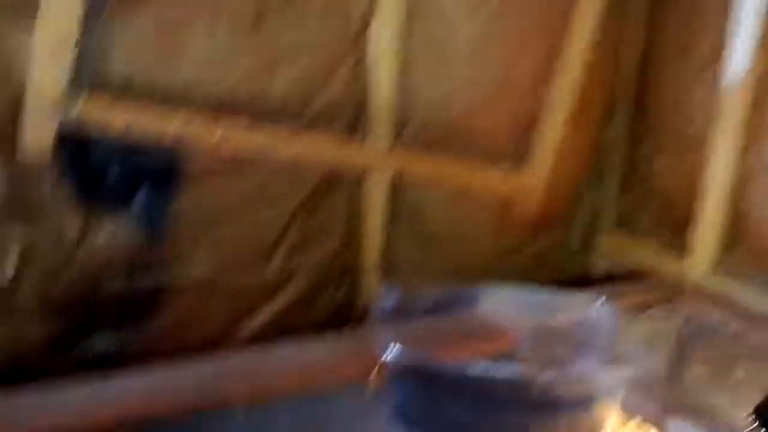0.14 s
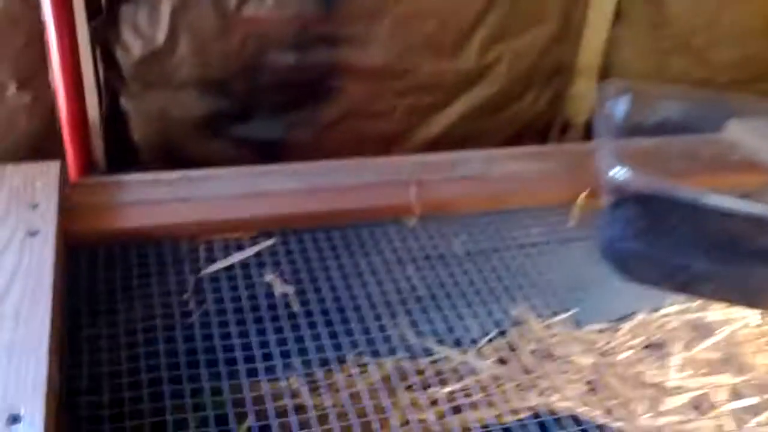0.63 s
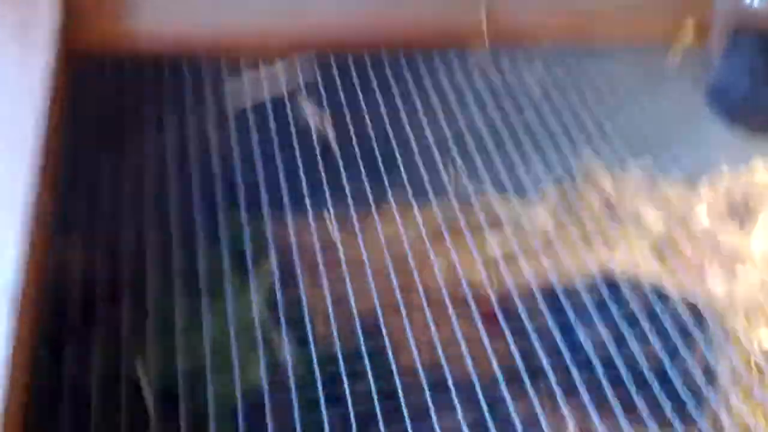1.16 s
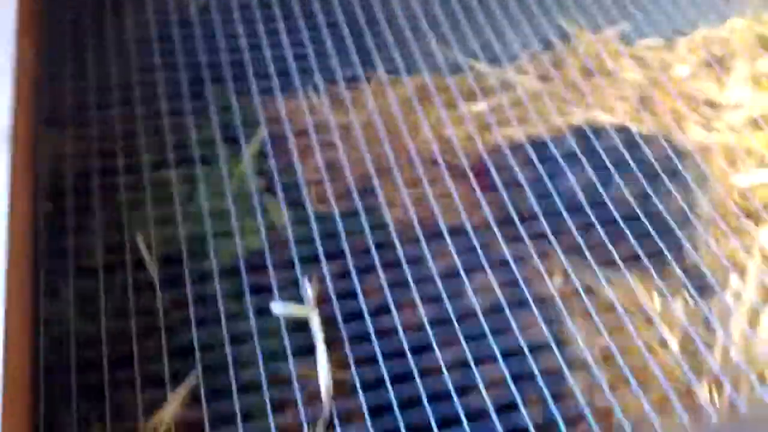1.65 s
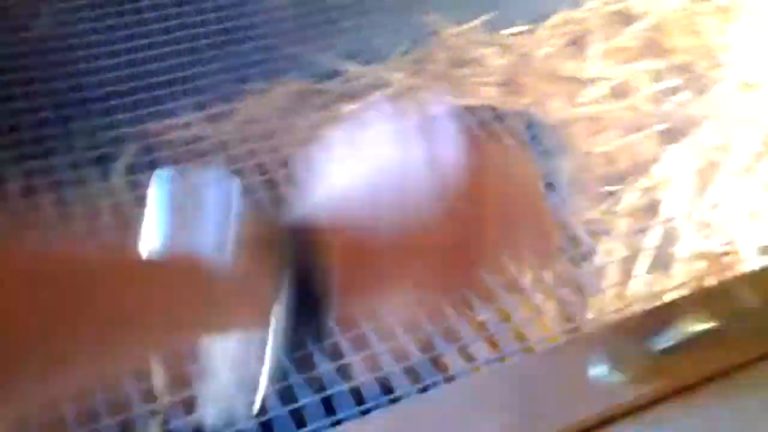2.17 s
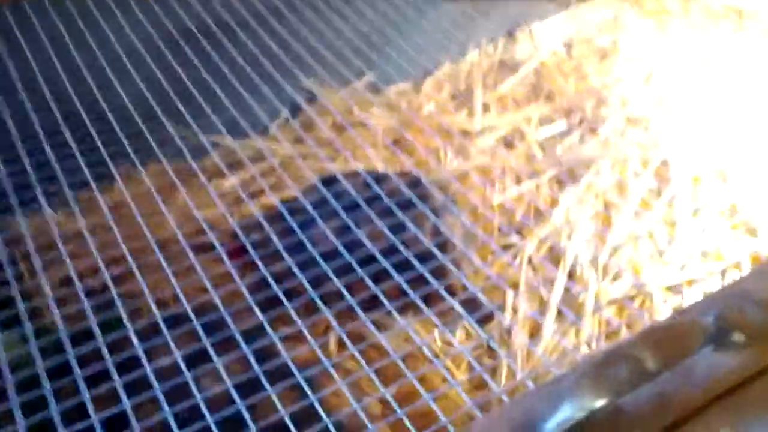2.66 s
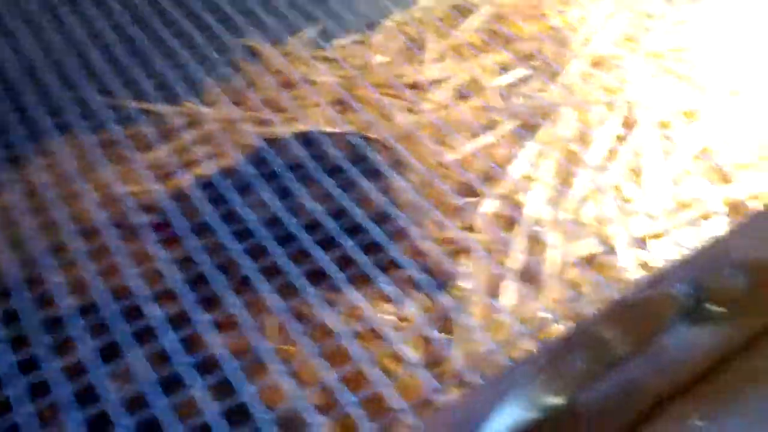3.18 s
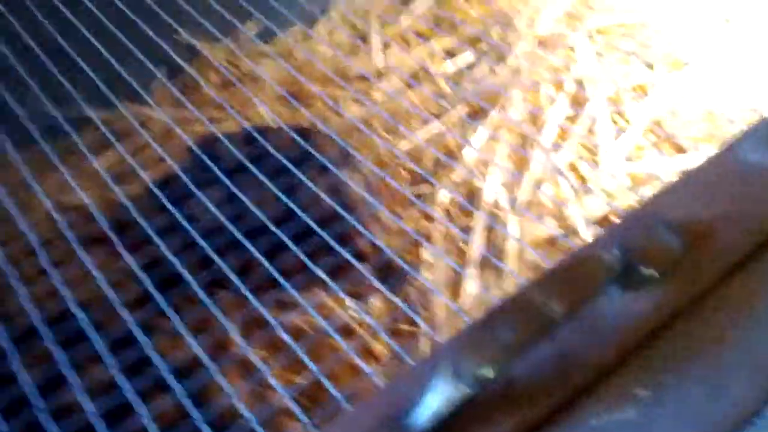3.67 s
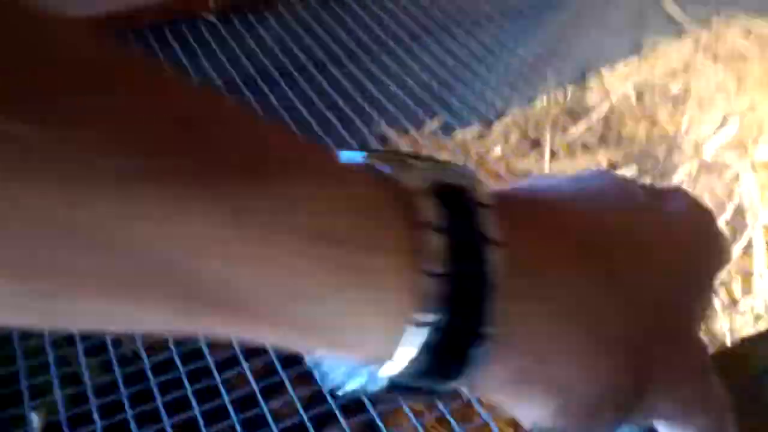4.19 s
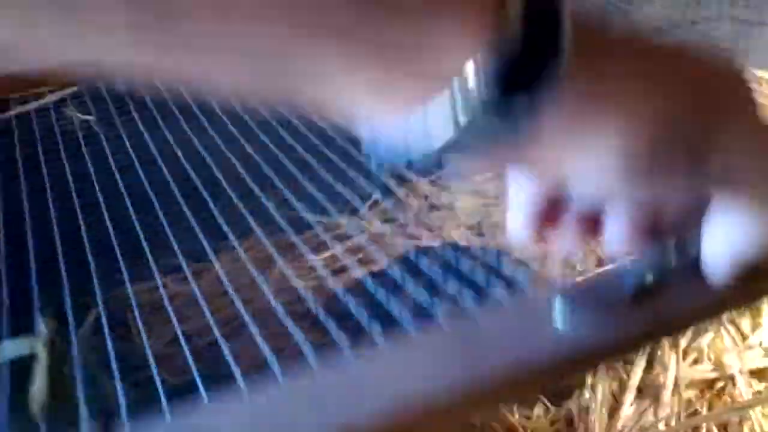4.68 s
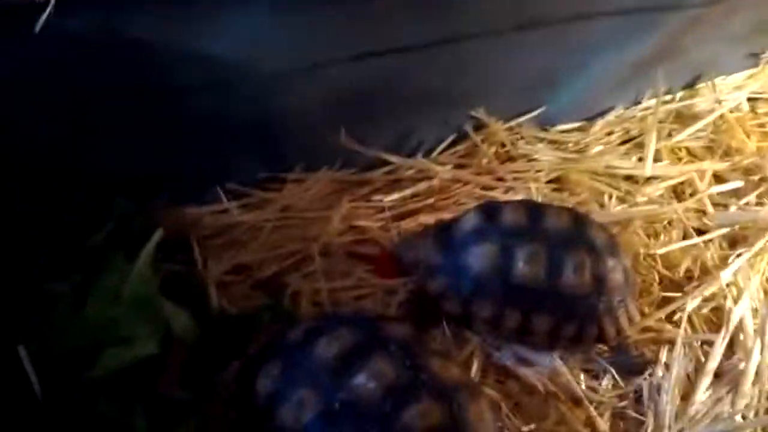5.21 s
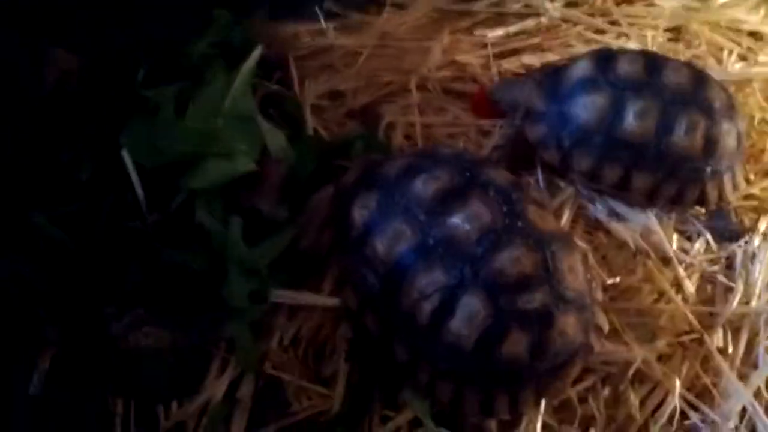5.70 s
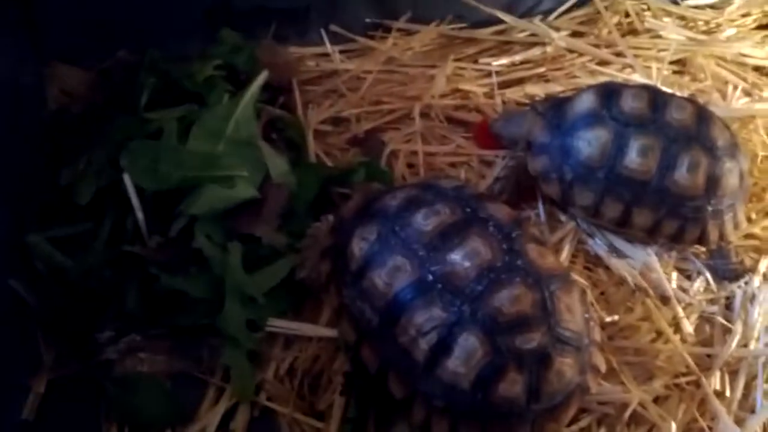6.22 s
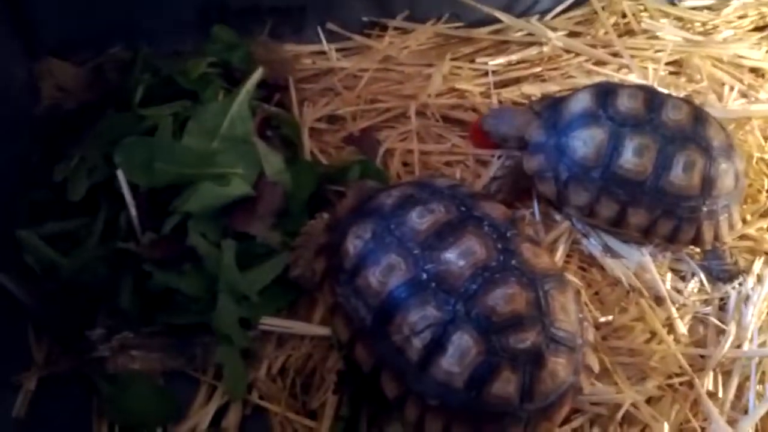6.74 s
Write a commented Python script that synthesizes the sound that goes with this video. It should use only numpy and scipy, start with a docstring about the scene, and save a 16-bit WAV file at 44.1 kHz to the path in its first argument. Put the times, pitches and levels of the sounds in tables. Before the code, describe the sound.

Close handling of a mesh-covered wooden pen: faint knocks, sharp cracks, scraping rattles and a dull thud, a short creak, then quiet hum and air.

```python
"""Mains hum and soft air noise in a small wooden shed, with a first knock almost at once. A hand
unlatches a wire mesh lid on a wooden pen: knocks and ticks on frame and wire, the lid drags and drops
with a thud, then a hinge creaks as it swings up. A hand-held phone hears it from close by.
Blows, rubbing strokes and hinge slips are noisy forces that ring banks of damped modes in wood and mesh;
the hum is sines, the air coloured noise, and ticks and squeaks are filtered bursts and brief tones."""
import sys
import numpy as np
from scipy import signal
from scipy.fft import rfft, irfft, next_fast_len
from scipy.io import wavfile
from scipy.ndimage import uniform_filter1d

SR = 44100
rng = np.random.default_rng(int(sys.argv[2]) if len(sys.argv) > 2 else 0)


def undo_db(level):
    """Turn decibels back into plain size, where 20 dB means ten times bigger."""
    steps = np.asarray(level, float) / 20
    return 10 ** steps


def output_pcm(signal):
    """Save a mono or channel-first signal as 16-bit PCM at the path in sys.argv[1].

    Samples are clipped to [-1, 1] before scaling.
    """
    pcm = np.clip(np.atleast_2d(signal).T, -1, 1) * 32767
    wavfile.write(sys.argv[1], SR, np.round(pcm).astype(np.int16))


N = 302305
T = np.arange(N) / SR

# ringing modes of the pen with its lid shut: (pitch_hz, relative_db, t60_s)
BOX = [(82, -1, 0.17), (137, -3, 0.14), (182.5, 3.5, 0.11), (232, 0.5, 0.1), (280, -3.5, 0.062),
       (343.5, -8, 0.13)]
FRAME = [(420, -9, 0.034), (477, -3, 0.095), (570, -1, 0.1), (610, -0.5, 0.043), (750, 2, 0.064),
         (700, 6.5, 0.054), (917, -1, 0.074), (1010, -4.5, 0.07)]
SLATS = [(1192, -6, 0.033), (1308, -3, 0.11), (1413, -3.5, 0.14), (1555, 6, 0.015), (1600, 1.5, 0.089),
         (1900, 0, 0.072), (2065, -5.5, 0.12), (2466, -0.5, 0.045), (2750, -7.5, 0.089),
         (2900, -5.5, 0.098)]
MESH = [(3730, -6, 0.017), (4350, -3, 0.015), (4870, 5, 0.019), (5580, 0.5, 0.025), (6040, -5, 0.049),
        (6590, 0, 0.025), (7000, -11, 0.055), (7460, -6.5, 0.03), (8580, 4.5, 0.014), (9400, -18, .012),
        (11400, -5, 0.014), (12400, -13, 0.01)]
# once raised, the lid hangs free and rings clearer: (pitch_hz, relative_db, t60_s)
LID_LOW = [(189.5, 2.5, 0.26), (196.2, -8, 0.18), (270, -17, 0.079), (372, -20.5, 0.061)]
LID_MID = [(496.4, 0, 0.13), (660, -4.5, 0.1), (700, -6.5, 0.089), (760, -5.5, 0.099), (914.5, 1.5, 0.11)]
LID_HIGH = [(1165, -7, 0.073), (1360, -2, 0.072), (1540, -1.5, 0.09), (1600, -3.5, .07), (1894, 3.5, 0.049),
            (2053, -4.5, 0.07), (2540, -3.5, 0.08), (2670, -6.5, 0.069), (3000, -9, 0.081)]
# the four parts in order: frame or middle, box or low, slats or high, wire mesh
SHUT = (FRAME, BOX, SLATS, MESH)
RAISED = (LID_MID, LID_LOW, LID_HIGH, MESH)
RAISED_S = 4.95  # events after this time ring the raised lid


def unit(x):
    """Scale to rms 1."""
    return x / np.sqrt(np.mean(x ** 2))


def curves(rows, silent=None):
    """Columns of a table as sample-rate lines; the first column is time in seconds."""
    s, *columns = np.transpose(rows)
    return [np.interp(T, s, c, left=silent, right=silent) for c in columns]


def band(x, lo_hz, hi_hz):
    """Band-pass."""
    sos = signal.butter(2, [lo_hz, min(hi_hz, .45 * SR)], "bandpass", fs=SR, output="sos")
    return signal.sosfilt(sos, x)


def walk(rate):
    """Random levels held 1 / rate s and smoothed twice; spread near 1."""
    k = int(SR / rate)
    steps = np.repeat(rng.standard_normal(N // k + 1), k)
    return 1.57 * uniform_filter1d(uniform_filter1d(steps, k), k)[:N]


def add(out, x, s):
    """Mix x into out from time s."""
    i = max(int(s * SR), 0)
    out[i:i + len(x)] += x[:N - i]


def swells(s, rise, fall, db):
    """Level in dB of overlapping swells: each climbs to its peak and falls away; the highest sets the level."""
    grid = T[::32]
    late = grid - np.array(s)[:, None]
    # rise and fall are seconds per 20 dB; anything below 5 ms acts as 5 ms
    before = -late / np.maximum(rise, .005)[:, None]
    after = late / np.maximum(fall, .005)[:, None]
    drop = np.where(late < 0, before, after)
    loudest = np.max(np.array(db)[:, None] - 20 * drop, axis=0)
    return np.interp(T, grid, np.maximum(loudest, -120))


def haze(x, modes, skirt_db=-27.0):
    """Countless small modes: a smooth colour along the outline of the named ones, falling off beyond them."""
    hz, db, _ = np.transpose(modes)
    size = next_fast_len(len(x))
    octave = np.log2(np.fft.rfftfreq(size, 1 / SR) + 1)
    outside = np.maximum(np.log2(hz[0]) - octave, 0) + np.maximum(octave - np.log2(hz[-1]), 0)
    outline = np.interp(octave, np.log2(hz), uniform_filter1d(db, size=3))
    colour = undo_db(outline + skirt_db * outside)
    return irfft(rfft(x, size) * colour / np.sqrt(np.mean(colour ** 2)), size)[:len(x)]


def ring(modes, dense_db, scatter_db, favour_db=0., detune=0.016):
    """Response to a tap: the named modes, struck differently each time, over a fading haze."""
    hz, db, t60 = np.transpose(modes)[:, :, None]
    t = T[:int(min(t60.max(), .3) * SR)]
    chance = rng.standard_normal((2, len(modes), 1))
    gain = undo_db(db + favour_db + scatter_db * chance[0])
    sines = np.sin(2 * np.pi * hz * (1 + detune * chance[1]) * t)
    tones = np.sum(gain * undo_db(-60 * t / t60) * sines, axis=0)
    favoured = np.hstack([hz, db + favour_db, t60])
    fading = haze(rng.standard_normal(len(t)), favoured) * undo_db(-60 * t / np.median(t60))
    both = band(unit(tones) + undo_db(dense_db) * unit(fading), 0.57 * hz.min(), 1.45 * hz.max())
    return both / np.sqrt(np.sum(both ** 2))


def pen(force, parts, levels_db, dense_db):
    """A running force rings each part at its own level."""
    out = np.zeros(N)
    for modes, db in zip(parts, levels_db):
        response = ring(modes, dense_db, 1.0, detune=0.0028)
        out += signal.oaconvolve(force * undo_db(db), response)[:N]
    return out


def rub(parts, levels_db, haze_db, modes_db):
    """Dense small catches in flurries stir the haze of every part and the named modes of the wood."""
    catches = undo_db(3.4 * np.minimum(rng.exponential(size=N), 5.5))
    grains = rng.standard_normal(N) * catches * undo_db(1.9 * walk(150))
    force = unit(grains * undo_db(1.34 * walk(35)))
    rasp = sum(haze(force * undo_db(db), modes) for modes, db in zip(parts, levels_db))
    return undo_db(haze_db) * rasp + undo_db(modes_db) * pen(force, parts[:-1], levels_db, -28.0)


def hum():
    """Mains multiples, each wavering on its own, the lowest the most; standing waves shape the first four."""
    # the phone sinks towards the pen through the standing waves: (time_s, travelled_m)
    path = [(0, 0.037), (.5, 0.18), (1, 0.2), (1.7, 0.24), (2.4, 0.26), (3, 0.49), (4.1, 0.41), (4.9, 0.27),
            (5.6, 0.49), (6.2, 0.6), (6.85, 0.58)]
    # first four mains multiples: (level_db at the loudest place, loudest_place_m)
    standing = [(-56, 0.74), (-54, 0.68), (-51.5, 0.43), (-58.5, 0.41)]
    # higher multiples: (multiple of the mains, relative_db)
    buzz = [(5, -5), (6, 0), (8, -13), (9, -6), (11, -15)]
    # multiples locked to the mains, the others start at random: multiple -> phase_turns
    lock = {1: 0, 2: .615, 3: .73, 4: .265, 6: .18}
    mains_hz, sound_m_s = 60.015, 343
    node_db = -19  # floor left in the nodes
    buzz_db, buzz_db_per_m = -66.5, -9.5
    slip_rad = .3  # phase wander of the lowest line

    place = curves(path)[0]
    lines = []
    for k, (db, m) in enumerate(standing, start=1):
        wave = np.cos(2 * np.pi * k * mains_hz * (place - m) / sound_m_s)
        lines.append((k, db + 10 * np.log10(wave ** 2 + undo_db(2 * node_db))))
    for k, db in buzz:
        lines.append((k, buzz_db + buzz_db_per_m * place + db))
    out = np.zeros(N)
    for k, db in lines:
        level = np.sqrt(2) * undo_db(db + (0.5 + 1.66 / k ** 2) * walk(10))
        turns = k * mains_hz * T + lock.get(k, rng.random())
        out += level * np.cos(2 * np.pi * turns + slip_rad / k * walk(6.3))
    return out


def air():
    """Steady air and microphone noise, coloured in the spectrum; its bands breathe and flicker separately."""
    # colour of the noise: (frequency_hz, relative_db per Hz)
    spectrum = [(12, -63), (20, -2.5), (137, -10.5), (181, -8.5), (254, -10), (292, -16), (365, -15),
                (408, -21.5), (539, -21), (637, -23.5), (866, -19), (1050, -28.5), (3700, -37), (6650, -35),
                (15800, -39.5)]
    size = next_fast_len(N)
    hz = np.fft.rfftfreq(size, 1 / SR)
    points = np.array(spectrum)
    colour = undo_db(np.interp(np.log(hz + 1), np.log(points[:, 0]), points[:, 1]))
    noise = rfft(rng.standard_normal(size)) * colour
    sway = np.zeros(N)
    # (from_hz, to_hz, sway_db)
    for lo, hi, db in ((0, 450, 1.2), (450, 1000, 1.3), (1000, 2000, 1.1), (2000, SR, .2)):
        layer = irfft(noise * (hz >= lo) * (hz < hi), size)[:N]
        sway += layer * undo_db(db * (walk(2.555) + 0.5 * walk(16)))
    drone = unit(band(rng.standard_normal(N), 93.0, 106.5))  # soft and rough, under the second hum line
    return undo_db(-56) * unit(sway) + undo_db(-63.5) * drone


def sizzle():
    """A faint narrow hiss high up: a fast random level on a sine of drifting pitch."""
    # (time_s, pitch_hz, gain_db)
    drift = [(2.2, 9200, -100), (2.5, 9200, -83), (3.3, 9140, -74.5), (4.1, 9400, -80), (5, 9400, -81),
             (5.6, 9500, -100)]
    hz, db = curves(drift)
    return undo_db(db) * walk(600) * np.sin(2 * np.pi * np.cumsum(hz) / SR)


def grip():
    """Fingers shifting on the phone: slow pressure on its body as swelling low noise."""
    # (peak_s, rise_s per 20 dB, fall_s per 20 dB, peak_level_db)
    shifts = [(.096, -2, 1, -56), (.298, 0.17, 0.18, -42), (.47, -1, 0.5, -53), (.73, -0.5, -0.5, -43),
              (.88, -1, 7, -68)]
    return unit(band(rng.standard_normal(N), 12.3, 43.0)) * undo_db(swells(*np.transpose(shifts)))


def squeaks():
    """Short squeaks of rubbed wire: brief sines whose phase wavers at random."""
    # (start_s, length_s, pitch_hz, level_db)
    chirps = [(0.106, 0.006, 1680, -67), (.59, 0.04, 1520, -71), (2.06, 0.035, 2950, -72),
              (2.43, 0.092, 2240, -76.5), (2.589, 0.041, 760, -45), (3.634, 0.0085, 1620, -48),
              (3.684, 0.0083, 1600, -45), (4.022, 0.012, 2800, -62.5), (4.435, 0.086, 1294, -64.5),
              (5.492, 0.0067, 1900, -59), (6.45, 0.036, 2400, -74)]
    out = np.zeros(N)
    for s, length, hz, db in chirps:
        t = T[:int(length * SR)]
        wobble = np.cumsum(rng.standard_normal(SR // 5))[:len(t)] * 0.0051
        tone = np.sqrt(2) * np.sin(2 * np.pi * hz * t + wobble)
        add(out, undo_db(db) * signal.windows.tukey(len(t), .4) * tone, s)
    return out


def ticks():
    """Bare ticks and short scuffs of wire on wire: band-passed noise, a sharp click with a short fizz."""
    # (start_s, peak_db, pitch_hz, fizz_ms, click_over_fizz_db)
    taps = [(0.026, -54.5, 3500, 17, -7), (0.418, -57, 3000, 12, -6), (1.709, -57, 4200, 18, -8),
            (2.707, -47, 2760, 6.8, -4), (2.708, -52, 5060, 8, 0.5), (2.9534, -46, 5260, 4.5, 16),
            (3.027, -45, 4830, 3, 14.5), (3.1232, -47.5, 5000, 4.4, 14), (3.227, -52.5, 4190, 17, 3.5),
            (3.519, -49, 4000, 8.6, -3), (3.561, -42.5, 5500, 18, -6), (3.561, -58, 10100, 10, -3),
            (3.602, -58, 10000, 7, -3), (3.63, -52, 7500, 14, -3.5), (3.701, -55, 9000, 10, 2),
            (3.73, -44.5, 5050, 17, -1), (3.733, -51, 10500, 6, 5), (3.744, -50, 10000, 5.5, -3),
            (3.763, -49, 5540, 4.6, 1), (3.765, -53, 10500, 5, 0), (3.826, -57, 5000, 5, 0),
            (4.3794, -58, 6220, 8, 1), (5.276, -48, 7000, 3, 6), (5.2878, -33, 6600, 2.6, 1),
            (5.296, -36, 5300, 4.9, 6), (5.3567, -49, 7000, 2.3, 13.5), (5.4436, -37, 7000, 11, 13.5)]
    out = np.zeros(N)
    t = T[:SR // 10]
    for s, db, hz, ms, click_db in taps:
        snap = undo_db(click_db) * np.exp(-t * 2500)
        fizz = (1 - np.exp(-t * 1500)) * np.exp(-t * 1000 / max(ms, .3))
        click = band(rng.standard_normal(len(t)) * (snap + fizz), 0.7 * hz, 1.37 * hz)
        click = band(click, 0.56 * hz, 1.73 * hz)
        add(out, undo_db(db) * click / np.abs(click).max(), s)
    return out


def drag():
    """Lid and hand rubbing and rattling: dull on the shut lid, singing in the modes once it is raised."""
    # (peak_s, rise_s per 20 dB, fall_s per 20 dB, peak_drive_db, weight_db)
    strokes = [(0.05, .03, 0.2, -59, -15), (0.235, 0.15, 0.16, -56.5, -6), (0.335, 0.5, 0.2, -61.5, -13),
               (0.425, 0.2, 0.23, -59, -8), (0.7, 0.4, 0, -69.5, 17), (1.03, 2.7, 0.5, -68, -11),
               (2.075, 0, 0.1, -59, -6), (2.105, -0.2, 0.1, -58.5, -4), (2.302, -0.2, -0.15, -59, 9),
               (2.45, 0.17, 1.2, -61.5, -3), (2.6, 0.2, 0.1, -55.5, -5), (2.65, -0.1, -0.5, -53, -3),
               (2.745, 0.25, 0.07, -49.5, 2), (2.79, 0.4, 0.15, -51, 3.5), (2.955, -0.5, 0.16, -55, 3),
               (3.08, -0.34, 0.02, -47, 3), (3.237, 0.09, 0.22, -47.5, -1), (3.394, 0.03, 0.295, -46, -8),
               (3.46, -0.5, 0.4, -50.5, -15), (3.525, -1, 0.43, -46, -3), (3.569, 0.15, 0.48, -46.5, -13.5),
               (3.71, .5, 0.12, -43.5, -2), (3.745, 0.25, 0.19, -39, 1), (4.0, -2, 0.5, -61, 10),
               (4.494, 0.16, 0.04, -54, 2), (4.584, -0.18, 0.58, -66, 13), (4.633, 0.3, -0.01, -51.5, 2),
               (4.75, -4, 0.5, -69, 2), (5.007, -0.1, -0.01, -47, 5), (5.09, 0.05, 0.2667, -44.5, -2.5),
               (5.16, -0.32, -0.0564, -39.5, -2), (5.23, 0, 0.16, -44, -0.5),
               (5.293, -0.05, 0.0878, -48, -8.5), (5.33, -2, 0.02, -53.5, -2), (5.459, -2, 0.2, -58.5, 13)]
    # how a stroke reaches the four parts; heavy ones favour the bass of the shut lid, light ones the wire:
    # (offset_db, db per dB of weight)
    shut_reach = [(-2, 0), (6, 0.75), (-6, -0.17), (-16.5, -0.5)]
    raised_reach = [(-1.5, 0.26), (-7.5, -1.1), (-1, -0.62), (-19, -2.3)]
    levels_db = []
    for reach, raised in ((shut_reach, False), (raised_reach, True)):
        chosen = [row for row in strokes if (row[0] > RAISED_S) == raised]
        s, rise, fall, db, weight = np.transpose(chosen)
        levels_db.append([swells(s, rise, fall, db + part_db + share * weight) for part_db, share in reach])
    return rub(SHUT, levels_db[0], -3.0, -11.5) + rub(RAISED, levels_db[1], -6.0, -3.0)


def creak():
    """Hinge stick-slip: every turn of the phase is a sharp tap, and grit grinds on between slips."""
    # (time_s, slips_per_s, force_db)
    hinge = [(5.0142, 87, -50), (5.059, 88.6, -45), (5.062, 166, -45), (5.082, 205, -41),
             (5.097, 186, -45.5), (5.11, 110, -43), (5.14, 130, -49), (5.18, 133, -59)]
    # how the slips reach the four parts: (db while the hinge bears the lid, db once the hand has the weight)
    creak_reach = [(2.5, 4), (7, -13), (-1.5, -3.5), (-6, -17)]
    unloading_s = [5.095, 5.125]
    low_hz, slip_top_hz = 37.0, 12600  # a slip is too slow to excite more
    rate, force_db = curves(hinge, silent=-120)
    levels = [force_db + np.interp(T, unloading_s, [loaded, free]) for loaded, free in creak_reach]
    phase = np.cumsum(np.maximum(rate, 0) * undo_db(.25 * walk(150)) / SR)
    slips = np.diff(np.ceil(phase), prepend=0) * undo_db(1.5 * rng.standard_normal(N))
    slips = slips * np.sqrt(SR / np.maximum(rate, 1))  # even power at every slip rate
    grit = rng.standard_normal(N) * undo_db(2.8 * rng.exponential(size=N))
    force = band(slips + undo_db(-5.0) * unit(grit), low_hz, slip_top_hz)
    force = band(force, low_hz, slip_top_hz)
    wood = pen(force, RAISED[:-1], levels, -2.1)
    return wood + pen(force, RAISED[-1:], levels[-1:], -8.0)


def knocks():
    """Blows on the wood: a push, longer for low pitches, with contact chatter, rings the modes near its pitch."""
    # (start_s, frame_peak_db, box_peak_db, slats_peak_db, struck_pitch_hz)
    blows = [(0.028, -50, -43, -49.5, 1400), (0.035, -35.5, -38.5, -49, 563), (0.046, -60, -52, -46, 1600),
             (0.073, -45, -53, -54, 800), (0.143, -43.5, -70, -55, 910), (0.215, -44.5, -48, -49, 1060),
             (0.244, -43, -58, -51, 550), (0.33, -52, -53, -57, 900), (0.413, -51.5, -49, -55, 900),
             (0.44, -52, -52, -54, 700), (1.298, -49, -66, -50.5, 740), (1.708, -51.5, -61, -55, 870),
             (1.717, -56, -64, -51, 1600), (2.063, -58, -60, -55, 864), (2.097, -51, -65, -53, 850),
             (2.299, -46.5, -48, -67, 509), (2.524, -46.5, -62, -53, 727), (2.639, -41.5, -52, -47, 463),
             (2.708, -23.5, -38, -43, 660), (2.717, -29.5, -33, -55, 736), (2.728, -36, -46, -55, 760),
             (2.738, -45, -34, -49, 497), (2.745, -31.5, -36, -49, 640), (2.763, -34, -42, -48, 600),
             (2.785, -35, -44, -51, 700), (2.952, -46, -58, -59, 554), (3.056, -30, -41.5, -44, 594),
             (3.064, -31.5, -44, -49, 560), (3.078, -37, -66, -46, 643), (3.225, -43, -46, -42.5, 1700),
             (3.238, -47, -32.5, -45, 440), (3.3129, -20, -32.5, -31, 960), (3.317, -27, -35, -28.5, 990),
             (3.322, -17, -36, -39, 745), (3.333, -29.5, -38, -42, 800), (3.343, -30, -35, -45, 700),
             (3.354, -43, -36, -58, 450), (3.519, -50, -41.5, -41, 680), (3.587, -54, -42, -40, 900),
             (3.607, -57, -32.5, -43, 450), (3.632, -55, -34.5, -47, 500), (3.654, -51, -45, -38, 900),
             (3.675, -48, -38, -38, 600), (3.684, -50, -26.5, -41, 450), (3.711, -47, -37, -47, 450),
             (3.726, -34, -27, -31, 400), (3.732, -30, -23.5, -31, 307), (3.739, -27, -16.5, -41, 336),
             (3.748, -28, -24.5, -36, 420), (3.76, -34, -27, -41, 455), (3.769, -32, -24, -39, 434),
             (3.785, -34, -31, -43, 452), (3.826, -54, -34, -47, 496), (4.012, -63, -45, -56, 552),
             (4.389, -51, -50, -56, 910), (4.482, -44, -35.5, -56, 644), (4.493, -58, -44, -44, 2100),
             (4.509, -53, -39, -44.5, 644), (4.55, -52, -36, -52, 640), (4.591, -42.5, -36.5, -55, 684),
             (4.62, -41, -45, -40.5, 1290), (5.276, -39, -35, -33, 660), (5.282, -32.5, -41, -39, 700),
             (5.287, -29, -28.5, -29, 910), (5.294, -30.5, -35.5, -37, 610), (5.533, -53, -51, -62, 760)]
    # modes that a blow favours in frame, box and slats: (multiple of the struck pitch, db per octave squared)
    favour = [(1, -38), (.42, -9.5), (1, -3)]
    contact_s, push_cycles = 0.0076, 0.41  # chatter time; push length in cycles of the struck pitch
    out, t = np.zeros(N), T[:SR // 10]
    for s, *levels_db, hz in blows:
        parts = RAISED if s > RAISED_S else SHUT
        contact = (1 - np.exp(-t / 0.0011)) * np.exp(-(t / contact_s) ** 2)
        chatter = rng.standard_normal(len(t)) * contact
        push = np.sin(np.pi * np.minimum(t * hz / push_cycles, 1)) ** 2
        force = undo_db(-3.0) * chatter / np.sqrt(np.sum(chatter ** 2)) + push / push.sum()
        for modes, db, (ratio, slope_db) in zip(parts, levels_db, favour):
            favour_db = slope_db * np.log2(np.array(modes)[:, :1] / (ratio * hz)) ** 2
            blow = signal.fftconvolve(force, ring(modes, -7., 2., favour_db))
            add(out, undo_db(db) * blow / np.abs(blow).max(), s)
    return out


def shed_echo(x):
    """The short, damped echo of the shed: decaying band-passed noise that starts after 4 ms."""
    t60_s, echo_db = 0.35, -17
    t = T[:SR // 2]
    walls = band(rng.standard_normal(len(t)), 59.0, 7100.0) * undo_db(-60 * t / t60_s) * (t > .004)
    return undo_db(echo_db) * signal.oaconvolve(x, walls / np.sqrt(np.sum(walls ** 2)))[:N]


def scene():
    """Handling sounds with the echo of the shed, over hum, air, hiss and the grip on the phone."""
    background = hum() + air() + sizzle() + grip()
    handling = squeaks() + ticks() + drag() + creak() + knocks()
    return (background + handling + shed_echo(handling))[None]


def low_pass(x):
    """Removes everything above the highest recorded frequency."""
    return signal.sosfilt(signal.butter(12, 16470, fs=SR, output="sos"), x)


def record(dry):
    """The finished mix as the phone delivers it."""
    return low_pass(dry)


dry = scene()
out = record(dry)
output_pcm(out)
```